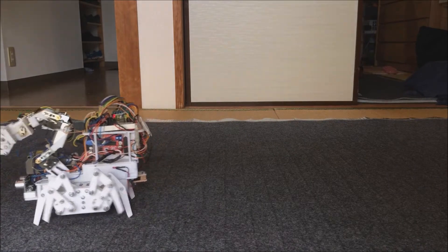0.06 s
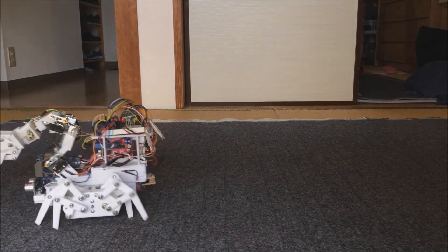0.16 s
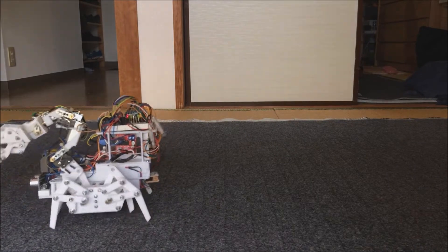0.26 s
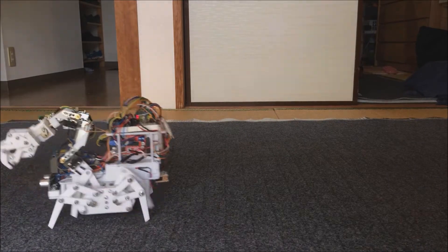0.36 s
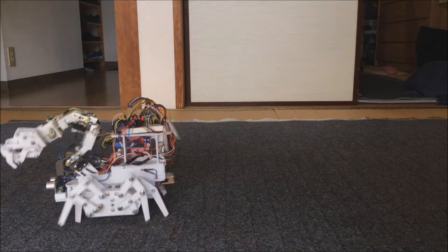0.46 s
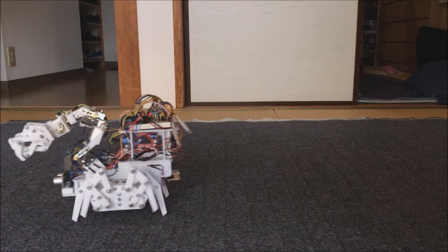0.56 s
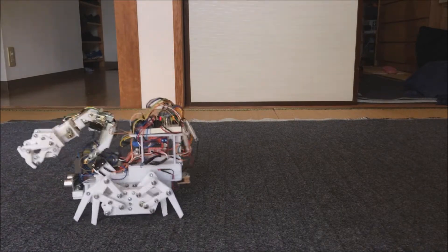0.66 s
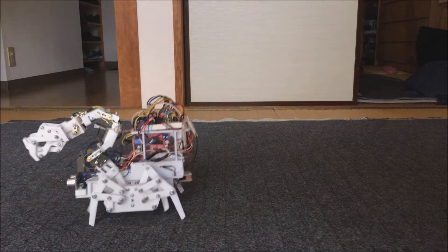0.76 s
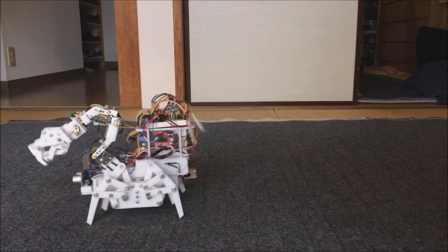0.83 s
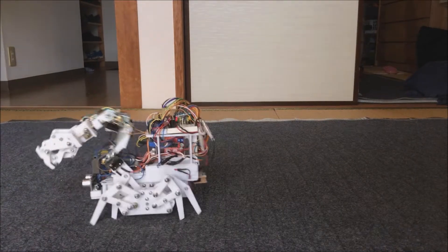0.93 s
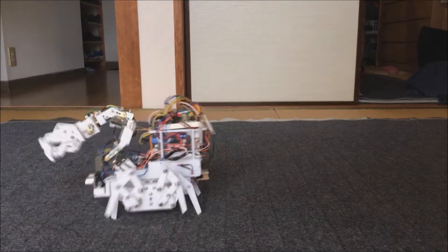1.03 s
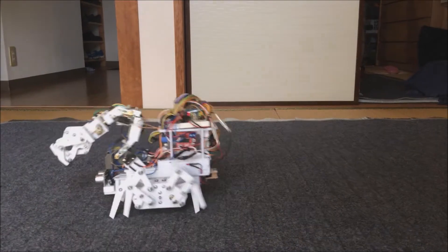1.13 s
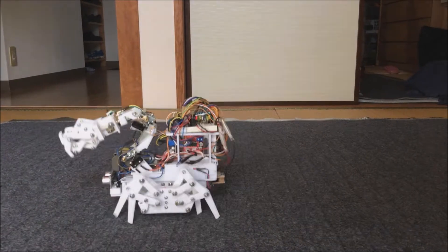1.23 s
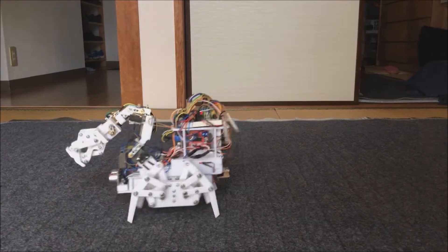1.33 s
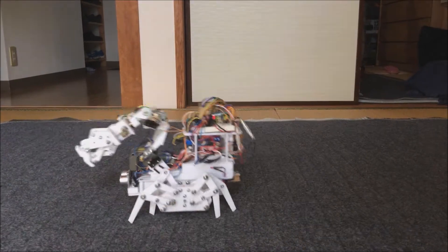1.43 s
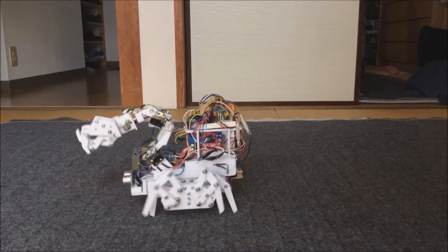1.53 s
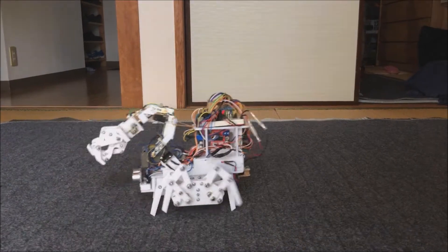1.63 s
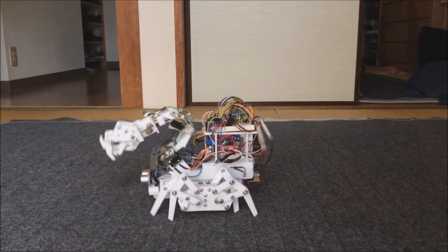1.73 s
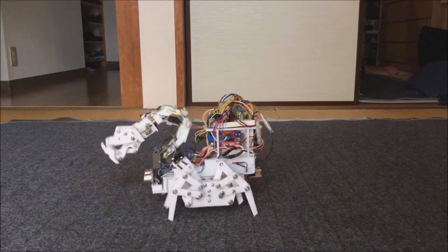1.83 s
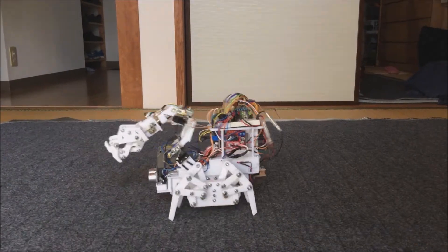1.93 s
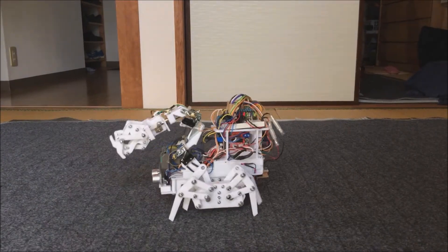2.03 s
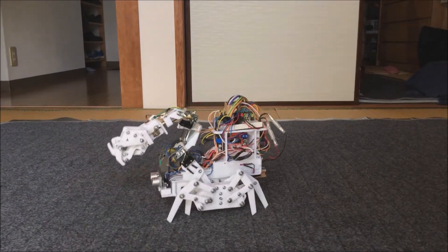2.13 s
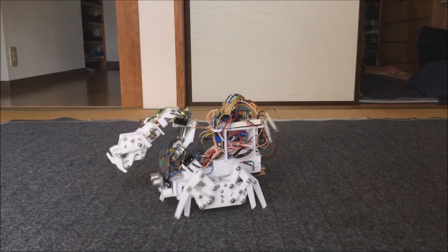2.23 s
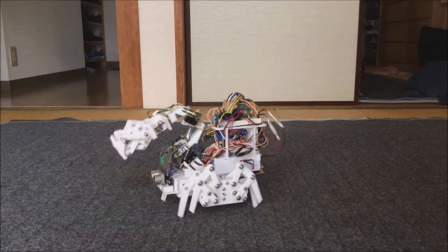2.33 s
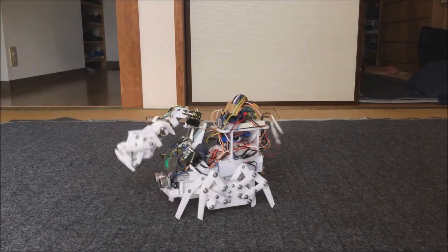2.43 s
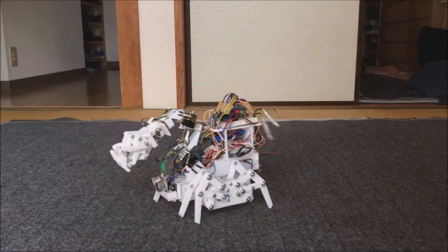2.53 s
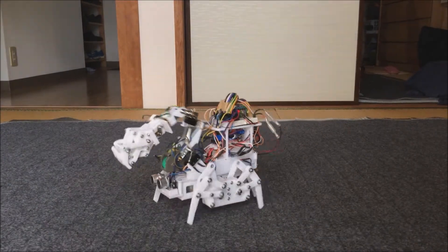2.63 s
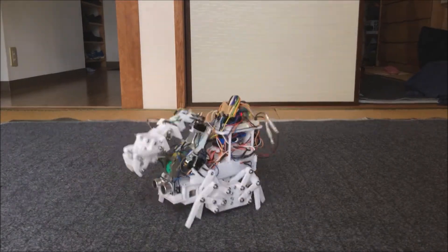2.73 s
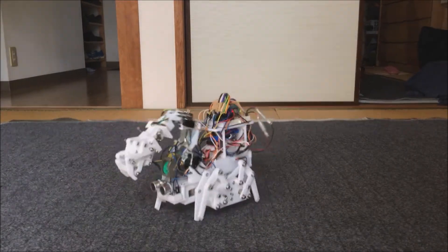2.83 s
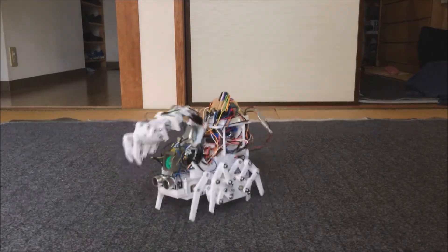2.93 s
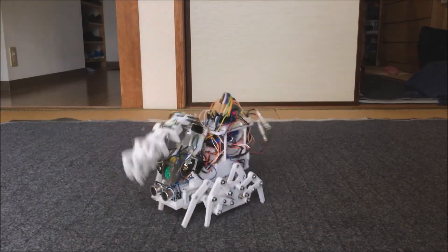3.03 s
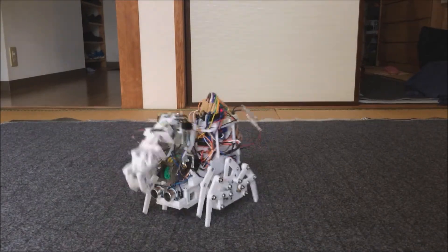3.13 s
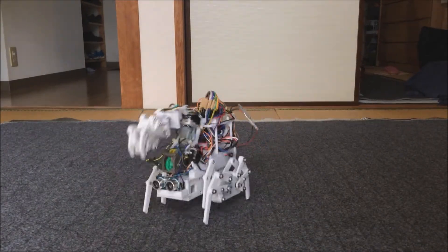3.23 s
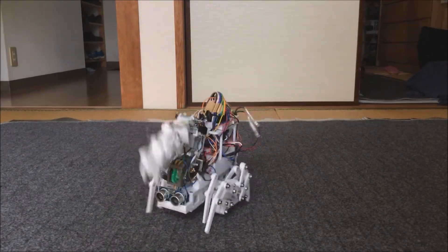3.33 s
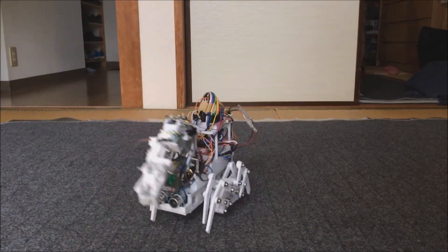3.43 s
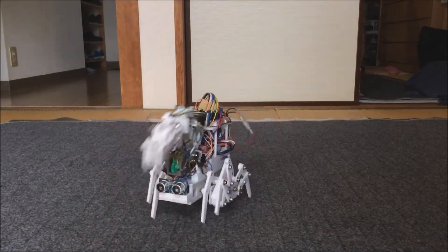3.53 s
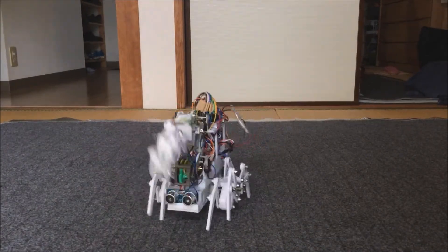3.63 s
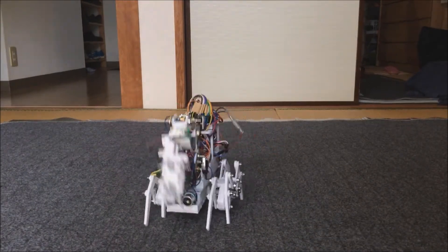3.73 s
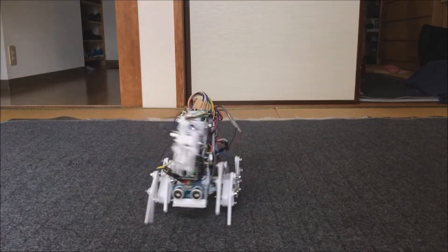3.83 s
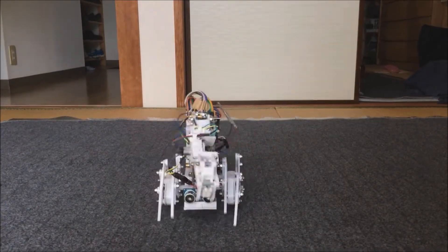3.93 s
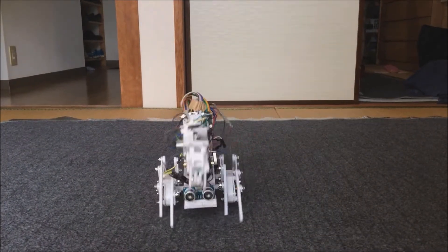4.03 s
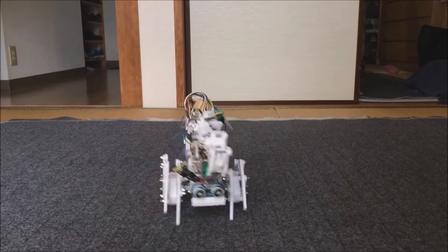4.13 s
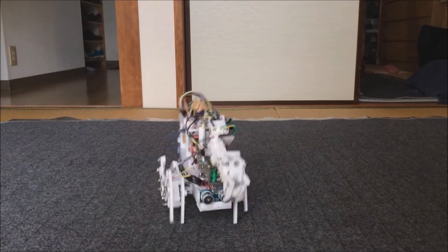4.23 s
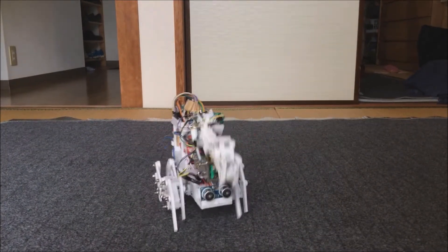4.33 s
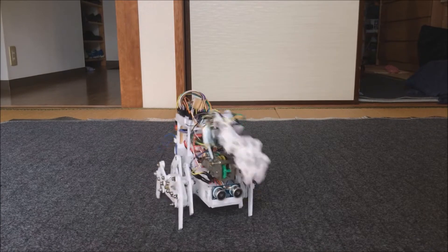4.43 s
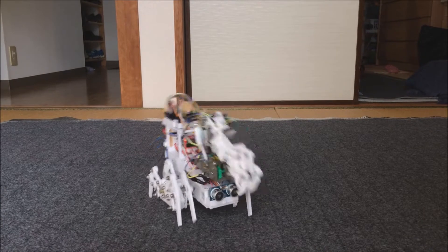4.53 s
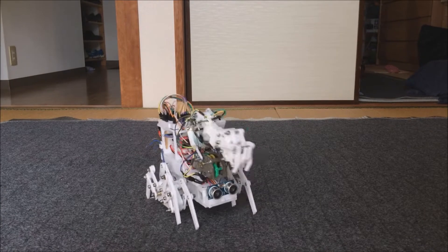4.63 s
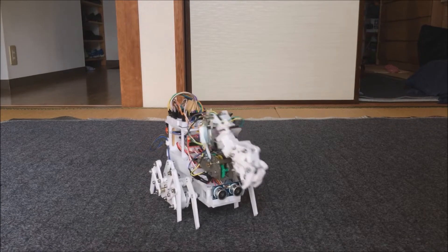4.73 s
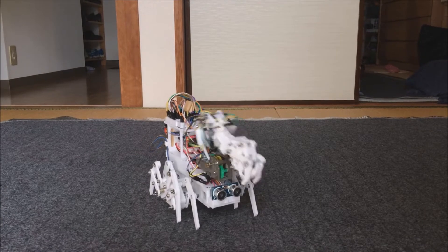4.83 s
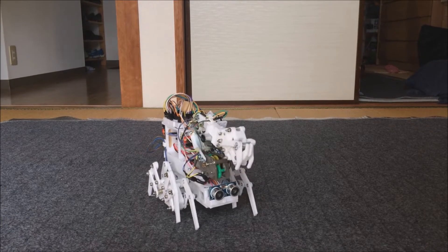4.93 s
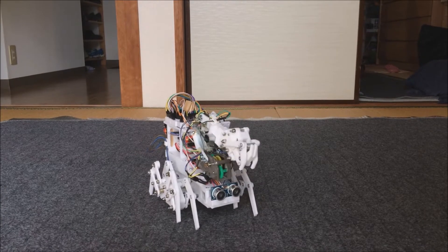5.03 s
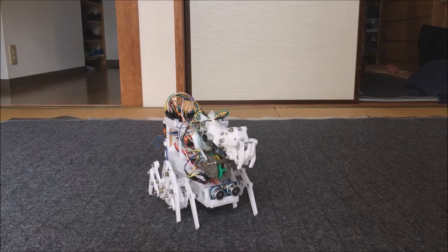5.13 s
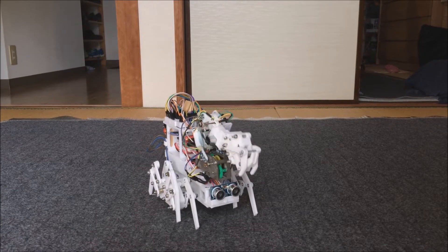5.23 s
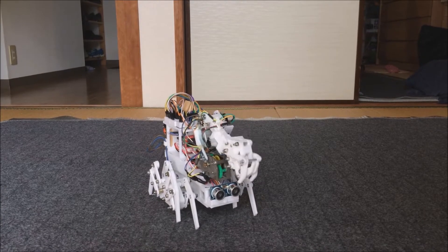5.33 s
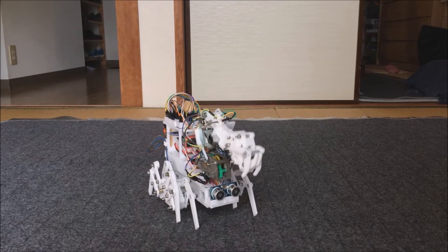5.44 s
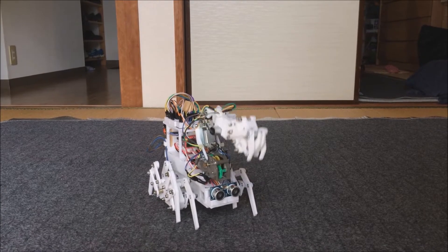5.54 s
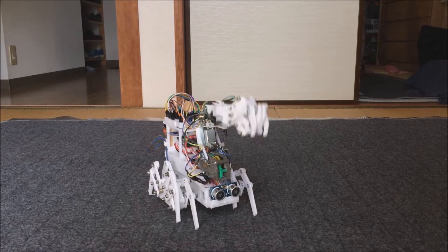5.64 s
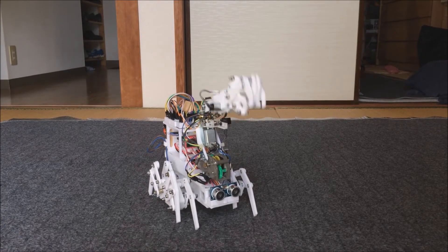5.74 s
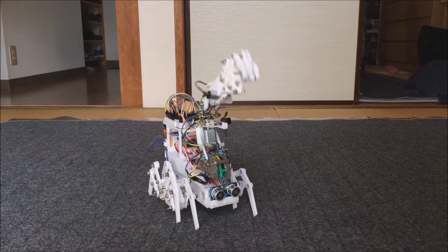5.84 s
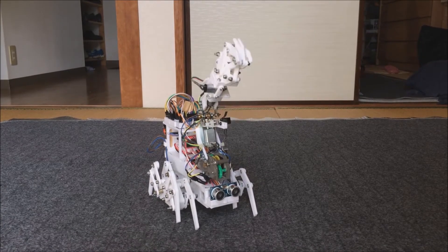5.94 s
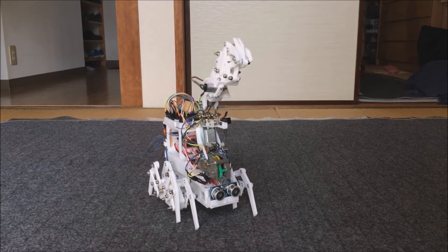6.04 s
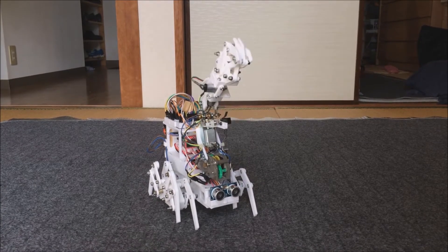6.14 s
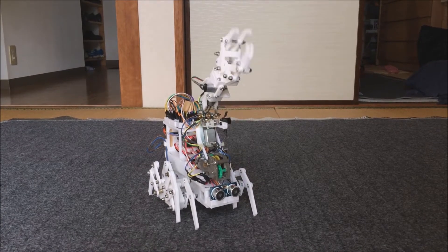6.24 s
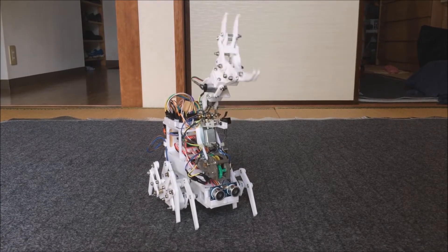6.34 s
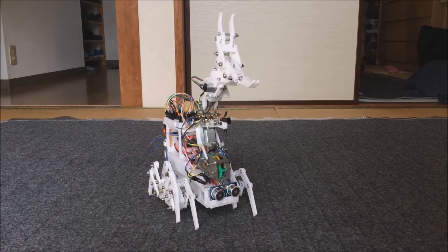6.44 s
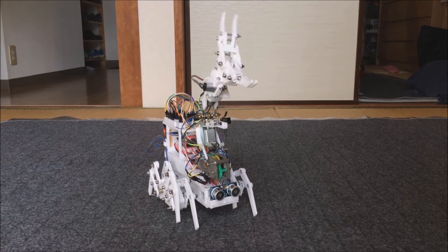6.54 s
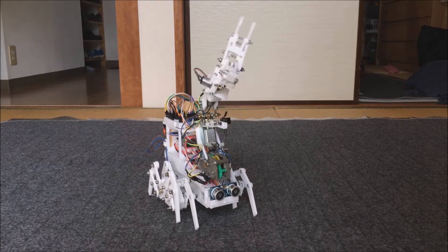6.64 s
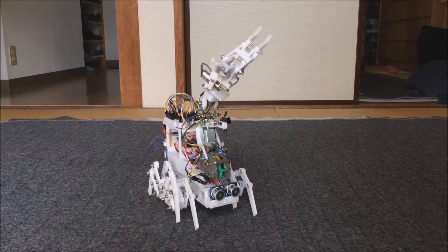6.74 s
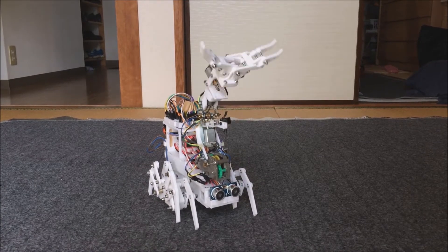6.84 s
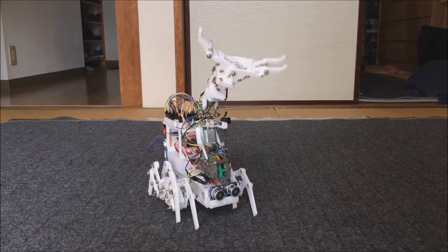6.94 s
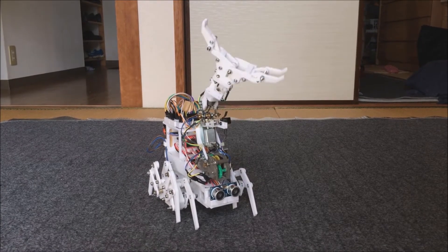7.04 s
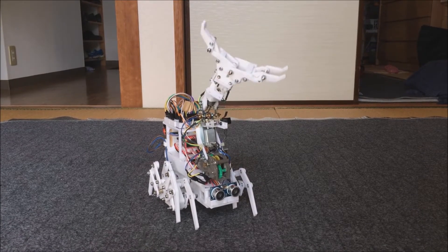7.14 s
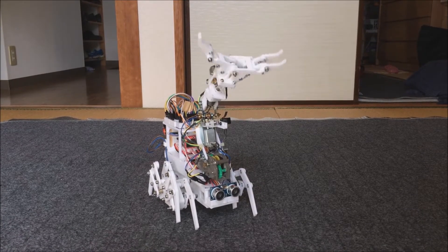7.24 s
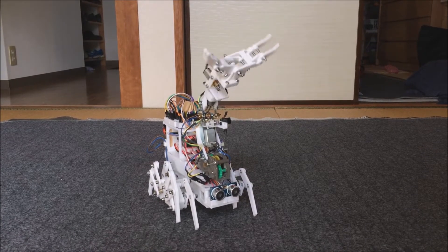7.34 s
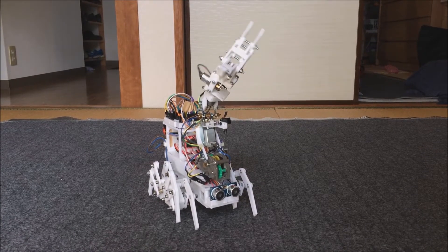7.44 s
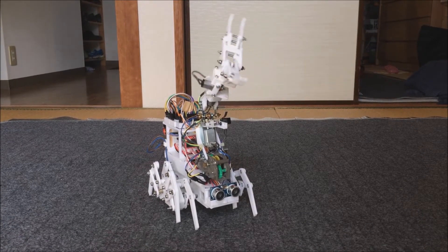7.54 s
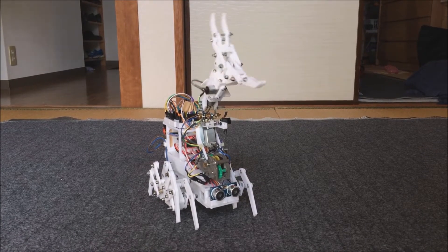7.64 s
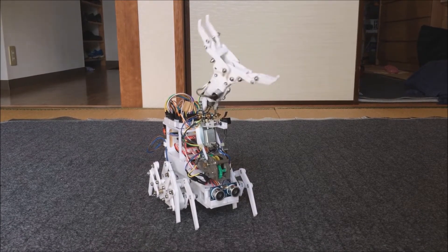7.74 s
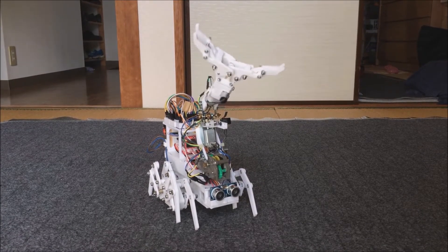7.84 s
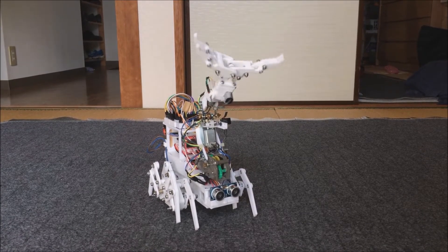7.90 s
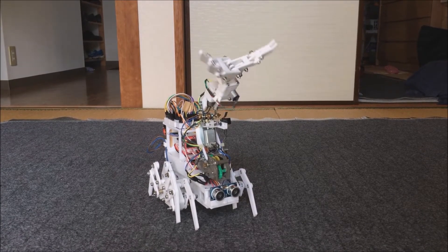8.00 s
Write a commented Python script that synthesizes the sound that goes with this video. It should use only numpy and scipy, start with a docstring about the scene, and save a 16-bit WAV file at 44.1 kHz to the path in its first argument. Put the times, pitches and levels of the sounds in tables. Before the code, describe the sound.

A small walking robot whirrs and rattles across carpet, then its servos lift its head with a whine and faintly buzz the gripper.

```python
"""A small six-legged robot walks over carpet in a quiet room that hums and hisses faintly throughout. First two
loose gear trains drive the resonances of its plastic frame: the whirr carries brief thin tones and changes
colour as the robot turns, while the feet thud softly. Now and then the sound dips for an instant while a few
narrow bands ring on. Near 5 s the walking ends, joints tick and scuff, and servos nudge the head, then lift it
with a whine that rises and falls. From about 6 s tiny, fast servos buzz and set the gripper's jaws and wrist
ringing."""
import sys
import numpy as np
from scipy import signal
from scipy.fft import rfft, irfft, next_fast_len
from scipy.io import wavfile

SR = 44100
rng = np.random.default_rng(int(sys.argv[2]) if len(sys.argv) > 2 else 0)


def put_to_file(sound):
    """Save the sound as 16-bit audio at rate SR, in the file named by the first command-line argument."""
    columns = np.atleast_2d(sound).T  # one column per channel
    safe = np.clip(columns, -1, 1)
    whole_steps = np.round(safe * 32767)
    wavfile.write(sys.argv[1], SR, whole_steps.astype(np.int16))


N = 355887
TIME = np.arange(N) / SR

# Speed of the leg gears, sagging as a leg takes the weight. Each row: time in seconds, mesh rate in Hz.
MESH_RATE = [(0, 741.8), (.15, 816), (.23, 934.6), (.45, 948), (.565, 843.5), (.6, 1058), (.72, 990),
             (.9, 971.4), (1.1, 1007), (1.33, 960.5), (1.43, 830.3), (1.53, 992.6), (1.8, 980),
             (2.12, 630.4), (2.26, 708), (2.34, 714.5), (2.41, 830.5), (2.45, 909), (2.52, 864.5),
             (2.62, 893.6), (2.74, 943.5), (2.89, 870), (2.98, 880.7), (3.13, 1031), (3.26, 903),
             (3.34, 743.7), (3.385, 714.5), (3.44, 716.6), (3.5, 899.4), (3.8, 1005), (4.08, 821.4),
             (4.3, 933.6), (4.62, 831), (4.85, 721)]


def undb(db):
    """Decibels to amplitude ratio."""
    return 10 ** (np.asarray(db) / 20)


def unit(x):
    """Normalisation to an rms of 1."""
    return x / np.sqrt(np.mean(x ** 2))


def wander(rate):
    """Bounded random fluctuation with a spread near 1, through `rate` new values a second."""
    knots = np.sqrt(3) * rng.uniform(-1, 1, 16384)
    return 1.2 * np.interp(TIME * rate, np.arange(len(knots)), knots)


def pulse(centre, half_width, axis=TIME):
    """A Gaussian swell that falls to 1/e at half_width from its centre."""
    return np.exp(-np.minimum(((axis - centre) / half_width) ** 2, 50))


def band(hz, width_hz):
    """Narrow-band noise: random modulation of a sine and a cosine whose frequency may move."""
    phase = 2 * np.pi * np.cumsum(hz) / SR
    return unit(wander(width_hz) * np.sin(phase) + wander(width_hz) * np.cos(phase))


def colour(x, points, modes=()):
    """Source and filter: a broad response (Hz, dB) with resonances (Hz, width in Hz, dB) shapes x."""
    size = next_fast_len(N)
    f = np.fft.rfftfreq(size, 1 / SR) + 1
    hz, db = np.transpose(points)
    bass_loss_db = 40 * np.log10(np.maximum(hz[0] / f, 1))
    gain_db = np.interp(np.log(f), np.log(hz), db) - bass_loss_db
    for centre, width, peak_db in modes:
        gain_db += peak_db / (1 + (2 * (f - centre) / width) ** 2)
    return unit(irfft(rfft(x, size) * undb(gain_db), size)[:N])


def motion(rows, attack_s):
    """Envelopes add in power; each move swells, holds, then fades ever faster (20 dB in its release).
    Gives the gain, then for the loudest move: time since start, time since stop, columns from level on."""
    table = np.transpose(rows)
    start, stop, release_s, db = table[:4, :, None]
    age, stopped = np.maximum(TIME - start, 0), np.maximum(TIME - stop, 0)
    fade_db = 20 * np.minimum((stopped / release_s) ** 1.4, 10)
    gains = undb(db - fade_db) * (1 - np.exp(-age / attack_s)) ** 2
    move, now = gains.argmax(axis=0), np.arange(N)
    return (np.linalg.norm(gains, axis=0) + 1e-9, age[move, now], stopped[move, now], *table[3:, move])


def turns(hz, wobble, rate):
    """Phase is the integral of frequency: cycles done by a shaft whose speed trembles under load."""
    return np.cumsum(hz * (1 + wobble * wander(rate))) / SR


def teeth(cycles, scatter_db, scrape, slide):
    """Impact and friction: each tooth knocks with its own force, then scrapes along its neighbour."""
    tooth = cycles.astype(int)
    force = undb(scatter_db * np.clip(rng.standard_normal(N), -2, 2))[tooth]
    knocks = np.diff(tooth, prepend=0) * force
    sliding = force * np.exp(-(cycles % 1) / slide) * rng.standard_normal(N)
    return unit(unit(knocks - knocks.mean()) + scrape * unit(sliding))


def flicker(x, depth_db, rate, count):
    """Independent amplitude modulation of each band: different parts rattle in turn."""
    size = next_fast_len(N)
    spectrum = rfft(x, size)
    place = np.sqrt(np.fft.rfftfreq(size) * 2) * count
    bands = (irfft(spectrum * np.maximum(1 - np.abs(place - k), 0), size)[:N] for k in range(count + 1))
    return unit(sum(part * undb(depth_db * wander(rate)) for part in bands))


def whine(cycles, orders, flutter_db, rate):
    """Periodic meshing gives harmonics (multiple, dB), each swelling with tooth contact."""
    return unit(sum(undb(db + flutter_db * wander(rate)) * np.sin(2 * np.pi * k * cycles)
                    for k, db in orders))


def hum():
    """Low-frequency background noise of the house, in which a narrow band swells twice as a tone."""
    # Spectrum of the hum. Each row: frequency in Hz, relative level in dB.
    spectrum = [(15, -51), (25, -24), (75, -6.5), (117, -1), (151, -12.5), (206, -10.5), (266, -21),
                (338, -22), (375, -27), (408, -22), (706, -37), (796, -32.5), (1500, -50), (1950, -75),
                (3300, -120)]
    # Low tones. Each row: peak time in seconds, level in dB, frequency in Hz, half-width in seconds.
    drones = [(2.55, -60, 172, .3), (5.25, -62, 126.6, 0.99)]
    drone = sum(undb(db) * pulse(s, span) * band(np.full(N, hz), 14) for s, db, hz, span in drones)
    return colour(rng.standard_normal(N), spectrum) * undb(-58.5 + 2 * wander(8.1)) + drone


def hiss():
    """Stationary broadband noise: a faint, even hiss."""
    return undb(-68) * colour(rng.standard_normal(N), [(500, 3), (1500, -3.5), (4000, -7), (15000, -5)])


def frame(rattle, facing):
    """Forced vibration and directivity: the shaken frame sounds different from side and front."""
    # Broad responses from each direction. Each row: frequency in Hz, gain in dB.
    side_response = [(180, -64.5), (300, -21), (372, -40.5), (723, -24.5), (958, -15), (1190, -18.5),
                     (2270, -1.5), (3060, -3), (3610, -6.5), (4480, -8.5), (4870, -6), (7250, -6.5),
                     (8700, -8), (12300, -12.5), (15800, -14.5)]
    front_response = [(180, -80), (300, -35), (633, -28.5), (839, -16.5), (1170, -20), (1290, -13),
                      (1500, -16.5), (1800, -5), (2230, -1.5), (2720, 7.5), (3790, -8), (6450, -13),
                      (7490, -13), (15000, -15), (15800, -9.5)]
    # Resonances from each direction, and narrow, closely spaced peaks that colour the whirr throughout.
    # Each row: frequency in Hz, width in Hz, gain in dB.
    side_modes = [(990, 340, 2.5), (2240, 590, 2), (4300, 220, 3), (7100, 390, 2)]
    front_modes = [(936, 80, -7.5), (2170, 280, 5), (2725, 690, -10), (6450, 680, 7.5), (9030, 1900, 5),
                   (13200, 550, 5)]
    narrow_peaks = [(1228, 23, 7), (1328, 25, 5), (1432, 49, 6), (1600, 35, 3), (1674, 27, 2),
                    (1786, 17, 5), (1876, 29, 2), (2006, 40, 1), (2227, 56, 2.5), (2590, 27, 2),
                    (2820, 47, 0)]
    # A metallic ring that swells near 2 s. Each row: frequency in Hz, gain in dB.
    zing_response = [(4150, -29.5), (4410, 1.5), (4520, 1), (4630, 6), (4900, -32)]
    side = colour(rattle, side_response, side_modes + narrow_peaks)
    front = colour(rattle, front_response, front_modes + narrow_peaks)
    zing = undb(-19.5) * pulse(2.02, 0.76) * colour(rattle, zing_response)
    return (1 - facing) * side + facing * front + zing


def legs():
    """Gear noise: tooth impacts in two loose trains shake the frame, and their mesh harmonics sing."""
    # Walks. Each row: start, stop and release in seconds, relative level in dB, treble in dB.
    walks = [(-.22, 1.83, 0.32, -22, -0.1), (2.1, 4.647, 0.16, -23, 1)]
    # Gear tones. Each row: multiple of the mesh rate, left and right levels in dB, change in front in dB.
    orders = [(2, -8, -4.5, 1), (3, -2.5, -2, 4), (5, -12, -8, -8.5), (7, -12, -3, -4)]
    gain, _, _, full_db, treble_db = motion(walks, attack_s=0.074)
    hz = np.interp(TIME, *np.transpose(MESH_RATE))
    left = turns(hz, wobble=.011, rate=120)
    right = turns(hz * (.94 + .03 * wander(12)), wobble=.016, rate=150)  # slower, and drifting
    # backlash lets every tooth land early or late
    contacts = (np.maximum.accumulate(np.abs(train + .3 * wander(900))) for train in (left, right))
    rattle = sum(teeth(cycles, scatter_db=1, scrape=1.45, slide=1) for cycles in contacts)
    rattle = flicker(rattle, depth_db=2, rate=80, count=24) * undb(.5 * wander(150) + .62 * wander(29.98))
    facing = np.clip((TIME - 1.9) / 2.66, 0, 1)  # the robot turns from side-on (0) to head-on (1)
    body = frame(rattle, facing)
    # the bright chatter of the teeth fades sooner than the frame's ring
    low = signal.sosfiltfilt(signal.butter(2, 5000, fs=SR, output="sos"), body)
    high_share = np.clip(undb(treble_db) * (gain / undb(full_db)) ** 0.42, 0, .9)
    body = undb(1.62) * unit(low) * np.sqrt(1 - high_share ** 2) + unit(body - low) * high_share
    left_orders = [(k, db + front_db * facing) for k, db, _, front_db in orders]
    right_orders = [(k, db + front_db * facing) for k, _, db, front_db in orders]
    speed_gain = (hz / 900) ** 2  # the right gears and the fundamental are weak at low speed
    tones = undb(-14.5) * whine(left, left_orders, flutter_db=3.5, rate=45)
    tones += undb(-14) * speed_gain * whine(right, right_orders, flutter_db=4, rate=45)
    tones *= undb(-0.5 * wander(17))  # the gears sing in fits
    # the rough fundamental of the mesh comes and goes with the load
    growl = wander(110) * np.sin(2 * np.pi * left) + wander(110) * np.cos(2 * np.pi * left)
    growl *= undb(-30.75 + 3.5 * wander(22)) * speed_gain
    return (body + tones + growl) * gain * undb(-1)


def room(x, t60, wet_db):
    """Reverberation: a small carpeted room answers with a short, exponentially decaying diffuse tail."""
    age = TIME[:SR // 2]
    tail = rng.standard_normal(len(age)) * undb(-60 * age / t60) * (age > .004)
    return x + undb(wet_db) * signal.fftconvolve(x, tail / np.linalg.norm(tail))[:N]


def thin_tones():
    """Brief thin tones, harmonics of the mesh rate, stand out of the whirr, several where it dips."""
    # Tones. Each row: peak time in seconds, harmonic number, level in dB, half-width in seconds.
    swells = [(0.077, 3, -30.5, 0.07), (0.226, 3, -31, 0.053), (0.227, 2, -30.5, 0.031),
              (0.562, 3, -24, 0.0099), (.615, 7, -24.5, 0.032), (0.65, 3, -29, 0.077),
              (1.436, 3, -25, 0.016), (2.287, 3, -24.5, 0.06), (2.39, 3, -29.5, 0.03),
              (2.548, 3, -28.5, 0.084), (2.946, 3, -27, 0.029), (3.347, 3, -27, 0.018),
              (3.401, 3, -22.5, 0.0096), (3.41, 9, -24, 0.03), (4.1, 3, -30.5, 0.037),
              (4.361, 3, -29.5, 0.044), (4.62, 3, -30, .035)]
    mesh = turns(np.interp(TIME, *np.transpose(MESH_RATE)), wobble=.007, rate=150)
    return sum(undb(db) * pulse(s, span) * np.sin(2 * np.pi * k * mesh) for s, k, db, span in swells)


def dips(x, ring_db, width_hz, count):
    """Brief dips: the level drops for an instant now and then, and only a few narrow bands of the sound ring
    on."""
    # Dips in level. Each row: centre in seconds, length in seconds, depth in dB.
    gaps = [(.237, .026, 28), (.483, .02, 11), (.566, .013, 16), (.61, .016, 13), (.779, .018, 25),
            (1.12, .015, 16), (1.44, .017, 17), (1.973, .012, 18), (2.144, .009, 18), (2.422, .015, 19),
            (2.914, .012, 10), (3.358, .019, 12), (3.416, .028, 27), (4.856, .014, 14), (5.066, .015, 13),
            (5.302, .014, 12), (5.683, .017, 12), (6.305, .012, 11), (6.88, .014, 19), (7.14, .015, 13),
            (7.243, .018, 20), (7.522, .012, 17), (7.926, .02, 13), (8.011, .014, 16)]
    out = x.copy()
    for (s, length, db), chance in zip(gaps, rng.random((len(gaps), count))):
        near = np.abs(TIME - s) < 3 * length
        offset, sound = (TIME[near] - s) / length, x[near]
        ring_hz = 1800 * 7 ** ((np.arange(count) + chance) / count)
        f = np.fft.rfftfreq(len(sound), 1 / SR)
        passbands = np.exp(-((f - ring_hz[:, None]) / width_hz) ** 2).sum(axis=0)
        ring = unit(irfft(rfft(sound) * passbands, len(sound)) + 1e-12)
        out[near] *= undb(-db * np.exp(-(2 * offset) ** 4))
        out[near] += undb(ring_db) * np.std(sound) * np.exp(-(1.5 * offset) ** 2) * ring
    return out


def steps():
    """Cushioned impact: feet landing on carpet excite only the low vibrations of the floor."""
    # Footfalls. Each row: peak time in seconds, relative level in dB, pitch in Hz, half-width in seconds.
    falls = [(0.316, -55, 75, 0.057), (0.701, -36.5, 65, 0.015), (0.877, -54, 75, 0.052),
             (1.196, -43, 66.95, 0.013), (1.267, -45, 76.4, 0.047), (2.189, -46, 87, 0.013),
             (3.469, -54, 80.3, 0.031), (4.444, -52, 92.5, 0.048)]
    thuds = sum(undb(db + 3) * pulse(s, span) * np.sin(2 * np.pi * hz * (TIME - s))
                for s, db, hz, span in falls)
    floor_response = [(40, -1), (90, 3), (170, -6), (300, -24), (1000, -47), (3000, -85.5)]
    boards = colour(rng.standard_normal(N), floor_response)
    return thuds + undb(-4.5) * boards * sum(undb(db) * pulse(s, span) for s, db, _, span in falls)


def scuffs():
    """Friction noise: plastic joints rub for an instant as they take up their slack."""
    # Rubs. Each row: peak time in seconds, level in dB, half-width in seconds.
    rubs = [(2.061, -28, 0.0057), (4.887, -49, 0.0084), (5.097, -47, 0.0046), (5.428, -43, 0.013),
            (5.471, -39.5, 0.0039)]
    friction = colour(rng.standard_normal(N), [(900, -29), (2800, 6), (5000, -3), (15000, -10)])
    return friction * sum(undb(db) * pulse(s, span) for s, db, span in rubs)


def ticks():
    """Impulsive excitation: slack in a joint snaps over with a bright click that rings the case."""
    # Joint ticks. Each row: start in seconds, relative level in dB, case ring against the click in dB.
    snaps = [(4.869, -38, -8), (5.092, -47, 11), (5.371, -44, 10), (6.281, -44, -19), (7.8567, -47.5, -23)]
    # Resonances of the case. Each row: frequency in Hz, width in Hz, gain in dB.
    case_modes = [(2400, 460, 3), (3780, 380, 13), (4750, 400, 4), (6530, 620, 8)]
    out = 0
    for s, db, ring_db in snaps:
        age = np.maximum(TIME - s, 0)
        snap = (age > 0) * np.exp(-age / 0.0021) * rng.standard_normal(N)
        crack = colour(snap, [(2000, -15), (5000, -15), (15000, 9)])
        case = colour(snap, [(800, -20), (2500, 1), (8000, 4), (15000, -3)], case_modes)
        out += undb(db) * np.std(snap) * (crack + undb(ring_db) * case)
    return out


def speed(age, stopped, kick, spin_up_s, coast_s):
    """Inertia: a motor jumps to the share `kick` of top speed, eases up to 1 and runs down evenly."""
    rise = kick + (1 - kick) * np.sin(np.pi / 2 * np.minimum(age / spin_up_s, 1))
    return rise * np.maximum(1 - stopped / coast_s, .1)


def nudge_whine(rotor, hz):
    """Resonance: a lightly loaded servo's whine flares as its top harmonic meets a mode of the case."""
    # Gear tones. Each row: multiple of the rotor rate, relative level in dB.
    orders = [(11, -15), (16, -14), (19, -11), (22, 6)]
    flare_db = 5 * pulse(3950, 220, axis=orders[-1][0] * hz)
    return whine(rotor, orders, flutter_db=4, rate=160) * undb(flare_db + 1)


def lift_whine(rotor, hz, top_hz, age, coasting, lifting):
    """Beating: two servos lift the head, one a little slower; coasting, one rough overtone winds down."""
    # Tones of three armature poles and an eight-tooth pinion.
    # Each row: multiple of the rotor rate, relative level in dB.
    full_speed_orders = [(3, -23.5), (6, -22), (8, -10), (11, -6), (16, 7), (20, -1), (24, 6)]
    slowness = np.maximum(1 - hz / top_hz, 0)
    orders = [(k, db - 0.3 * k * slowness) for k, db in full_speed_orders]  # dull at low speed
    pair = whine(rotor, orders, flutter_db=5.5, rate=260)
    pair += .5 * whine(.978 * rotor, orders, flutter_db=3, rate=90)
    pair /= np.std(pair[lifting])
    seating = 1 - np.exp(-(age / 0.035) ** 2)  # the teeth take a moment to seat under load
    strain_db = 4 * pulse(0.12, 0.044, age)  # they press hardest while speeding up
    return (1 - coasting) * undb(strain_db) * seating * pair + coasting * band(16 * hz, width_hz=480)


def neck():
    """Pitch follows shaft speed: servos spin up and run down, nudging the head and then lifting it."""
    # Moves. Each row: start, stop and release in seconds, level in dB, top rotor rate in Hz,
    # relative tone level in dB, braking boost in dB, load from 0 to 1, relative pinion hum in dB.
    moves = [(4.884, 5.09, 0.16, -49.5, 184, -6.5, 8, 0.06, -13.5),
             (5.194, 5.277, 0.18, -51.5, 238.1, -3, -1.5, 0, -32),
             (5.402, 5.521, .1, -48, 199.4, -29, 0, 0, -35),
             (5.485, 5.96, 0.13, -28, 296, -8, 1, 0.96, -30)]
    # Response of the servo case, running light and lifting. Each row: frequency in Hz, gain in dB.
    light_case = [(240, -46), (400, -16), (489, -24), (588, -17), (1370, -6), (1700, -4.5), (3000, -1),
                  (3500, 0), (5220, -1), (15800, -6.5)]
    loaded_case = [(240, -54), (400, -40), (512, -40), (877, -39), (1330, -33.5), (2740, -12),
                   (3720, -11.5), (4690, -6.5), (8030, -9), (9960, -6), (10800, -13), (12200, -8),
                   (15800, -8)]
    # Case resonances under load. Each row: frequency in Hz, width in Hz, gain in dB.
    loaded_modes = [(2920, 1500, 6), (9930, 700, 3)]
    # Hum of an unloaded servo. Each row: multiple of the rotor rate, relative level in dB.
    pinion_orders = [(3, -7.5), (8, 1)]
    loads = np.array(moves)[:, -2:-1]
    attack_s = (1 - loads) * .012 + loads * .055
    gain, age, stopped, _, top_hz, tone_db, brake_db, load, pinion_db = motion(moves, attack_s)
    coast_s = (1 - load) * .125 + load * .33
    coasting = np.minimum(stopped / .015, 1)
    hz = top_hz * speed(age, stopped, kick=.45, spin_up_s=.235, coast_s=coast_s) * (1 + .007 * wander(20))
    hz *= 1 + .055 * pulse(5.95, 0.042)  # the load eases as the head nears the top
    rotor = turns(hz, wobble=.012, rate=400)
    rattle = teeth(np.abs(3 * rotor + .12 * wander(700)), scatter_db=1.5, scrape=3.1, slide=0.95)
    rattle = flicker(rattle, depth_db=1.1, rate=65, count=16) * undb(wander(130))
    loose = turns(hz, wobble=.013, rate=700)  # unloaded teeth chatter and roughen the pinion's hum
    speed_gain = (hz / top_hz) ** 2
    nudge = nudge_whine(rotor, hz) * speed_gain
    pinion = whine(loose, pinion_orders, flutter_db=3, rate=120)
    pinion *= undb(pinion_db + 7 * coasting) * pulse(0, 0.052, stopped)  # flares on braking, then dies
    lift = lift_whine(rotor, hz, top_hz, age, coasting, lifting=(load > .5) & (stopped == 0))
    tone_gain = undb(tone_db) * pulse(0, .085, stopped)
    brush_sizzle = undb(-5.5 + 2.3 * wander(30)) * band(10000 * (1 + .012 * wander(13)), width_hz=410)
    light = colour(rattle, light_case, [(3700, 600, 4.1)]) + tone_gain * nudge + pinion
    loaded = colour(rattle, loaded_case, loaded_modes) + tone_gain * lift + brush_sizzle * speed_gain
    braking = undb(brake_db * pulse(0.068, 0.1, stopped) * (stopped > 0))  # backlash rattles
    return ((1 - load) * light + load * loaded) * gain * braking


def gripper():
    """Forced vibration: tiny servos hiss, sing and shake jaws and wrist; between moves they idle faintly."""
    # Moves. Each row: start, stop and release in seconds, level in dB, rotor rate in Hz,
    # then relative levels of the tones, jaw ring and wrist ring in dB.
    moves = [(6.262, 6.52, 0.055, -53.5, 220.6, -20, -26.5, -26),
             (6.52, 6.57, .035, -48.5, 221.3, -23, -30, -22),
             (6.65, 7.08, 0.07, -58, 218.6, -19, -11, -18.5), (7.05, 7.18, .08, -64.5, 222.3, -20, -19, -5),
             (7.26, 7.82, 0.085, -65.5, 224.3, -7, -7, -19), (7.83, 8.1, .1, -63, 222.5, -7, -6.5, -25)]
    # Gear tones. Each row: multiple of the rotor rate, relative level in dB.
    orders = [(8, -11), (9, -3), (11, -10), (12, -6), (21, -7), (24, -1.5), (27, -7), (36, -6), (39, -0.5),
              (45, -2)]
    # Responses of the plastic parts. Each row: frequency in Hz, gain in dB.
    case_response = [(1940, -51), (3300, -16.5), (4700, -19), (4920, -13), (5360, -21), (5720, -21),
                     (7500, -9), (9400, -0.5), (15800, -4)]
    jaw_response = [(2300, -22), (2620, -3.5), (2780, 6.5), (2900, -15), (3200, -23), (5100, -21),
                    (5360, -3.5), (5600, -20.5), (8300, -28), (8750, -10), (9300, -15.5)]
    wrist_response = [(4500, -33.5), (6150, -2), (6900, -2), (8200, -23)]
    gain, _, _, _, hz, tone_db, jaw_db, wrist_db = motion(moves, attack_s=0.016)
    rotor = turns(hz * (1 + .003 * wander(4.9)), wobble=0.01, rate=810)
    rattle = teeth(3 * rotor, scatter_db=1, scrape=4, slide=0.56)
    rattle = flicker(rattle, depth_db=1.6, rate=70, count=16)
    jaws = undb(jaw_db + 2.5 * wander(55)) * colour(rattle, jaw_response)
    wrist = undb(wrist_db) * colour(rattle, wrist_response)
    tones = undb(tone_db) * whine(rotor, orders, flutter_db=5, rate=90)
    buzz = colour(rattle, case_response) + jaws + wrist + tones
    idle = undb(-75.5)
    return buzz * np.hypot(gain, idle) * undb(1.5 * wander(70))  # the drive comes in uneven spurts


def scene():
    """Superposition of the robot and its room, the same in both channels."""
    robot = room(legs() + neck() + gripper() + scuffs(), t60=0.14, wet_db=-11)
    whirr = dips(robot + hiss(), ring_db=-5.5, width_hz=12, count=12)
    clicks = room(ticks(), t60=0.37, wet_db=0)
    return np.tile(whirr + clicks + thin_tones() + steps() + hum(), (2, 1))


def record(dry):
    """Soft saturation rounds the highest peaks, and a steep low-pass filter cuts the top."""
    top_hz = 15800
    rounded = .5 * np.tanh(dry / .5)
    return signal.sosfilt(signal.ellip(12, .1, 80, top_hz, fs=SR, output="sos"), rounded)


dry = scene()
out = record(dry)
put_to_file(out)
```